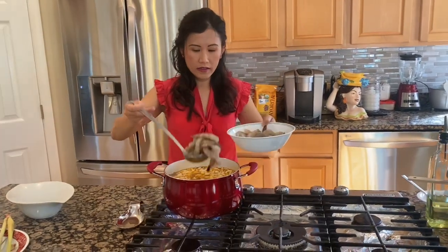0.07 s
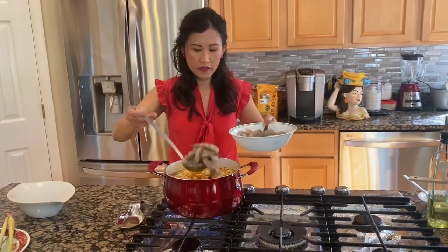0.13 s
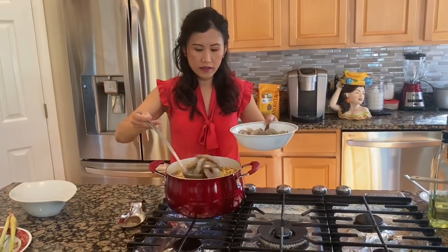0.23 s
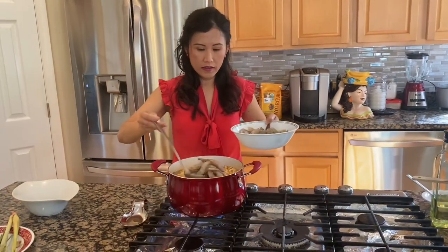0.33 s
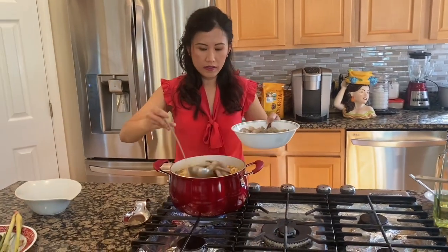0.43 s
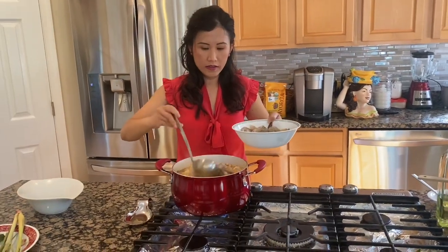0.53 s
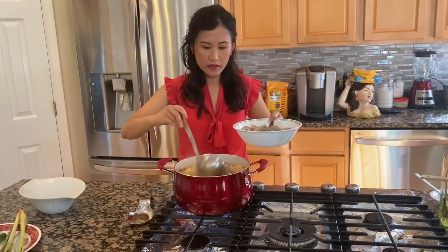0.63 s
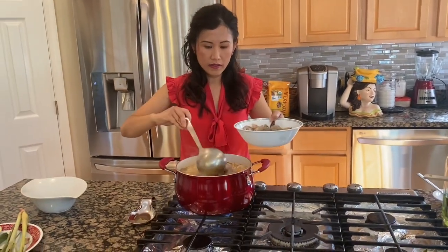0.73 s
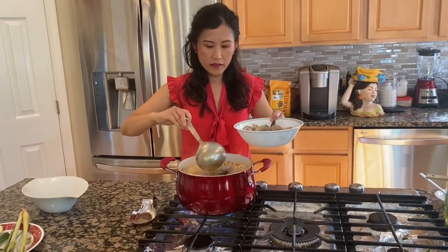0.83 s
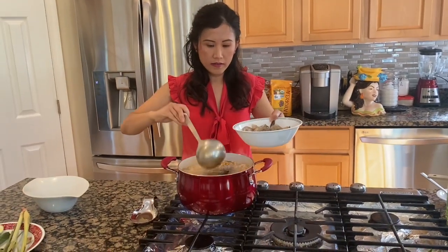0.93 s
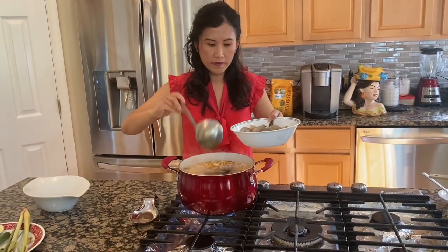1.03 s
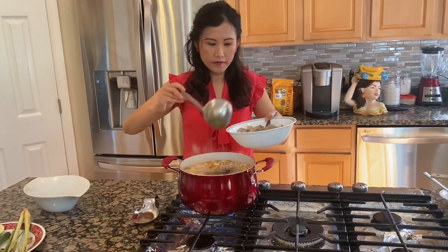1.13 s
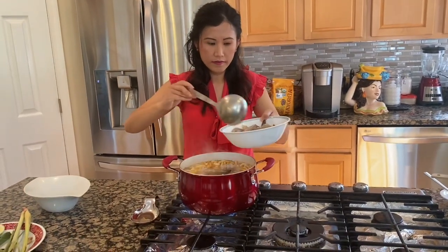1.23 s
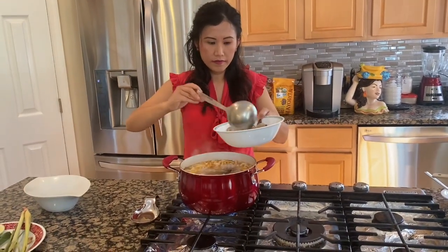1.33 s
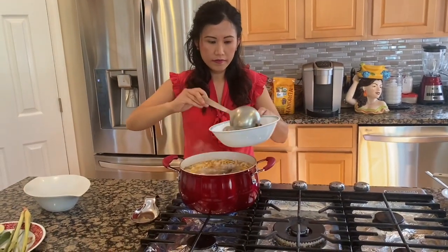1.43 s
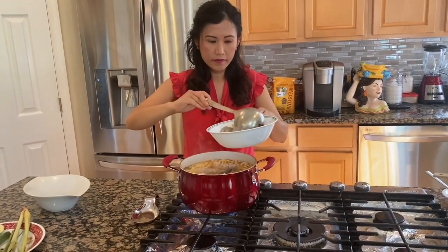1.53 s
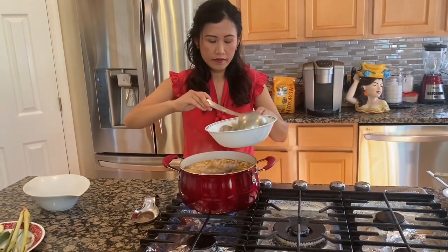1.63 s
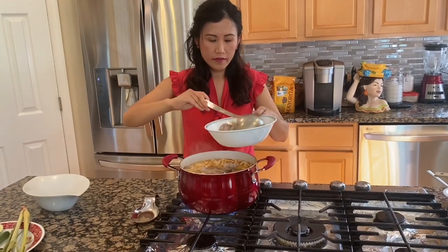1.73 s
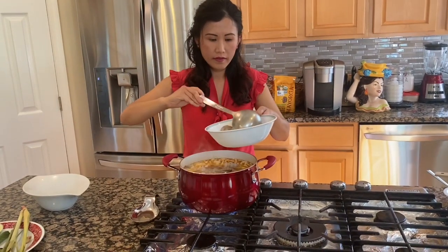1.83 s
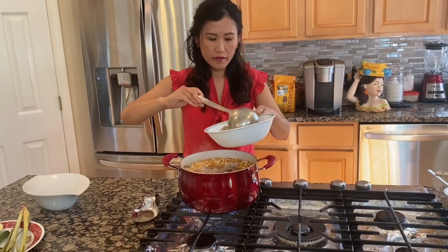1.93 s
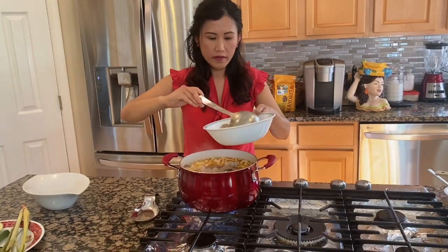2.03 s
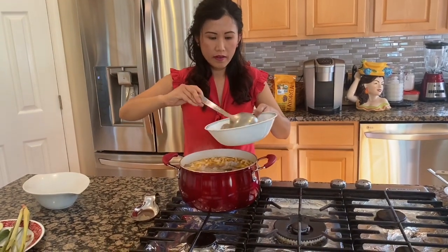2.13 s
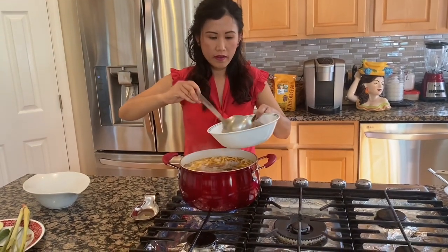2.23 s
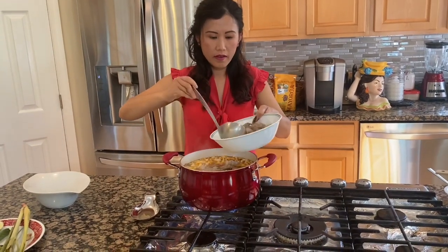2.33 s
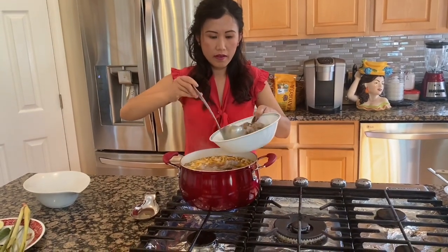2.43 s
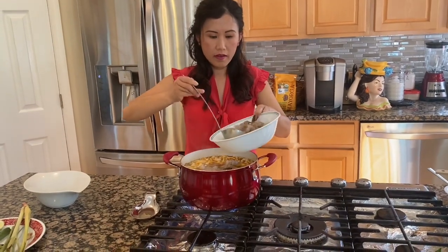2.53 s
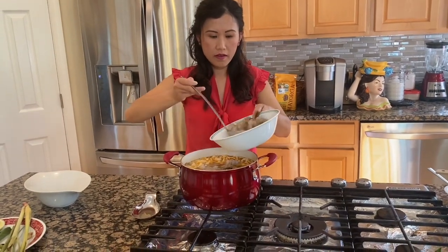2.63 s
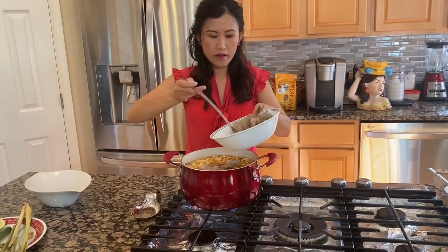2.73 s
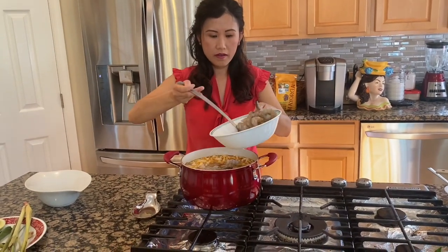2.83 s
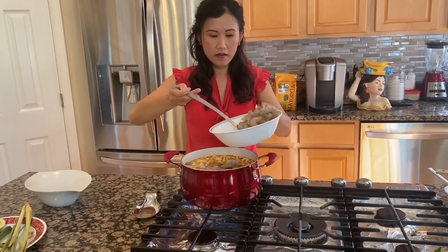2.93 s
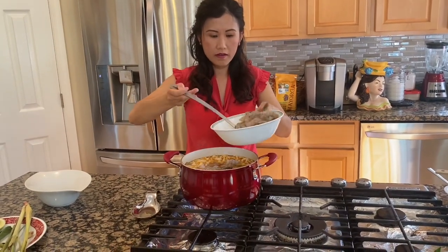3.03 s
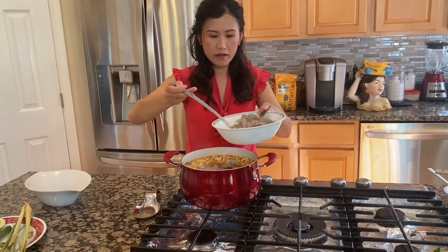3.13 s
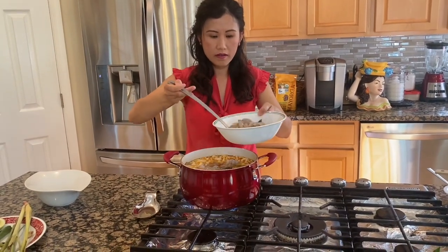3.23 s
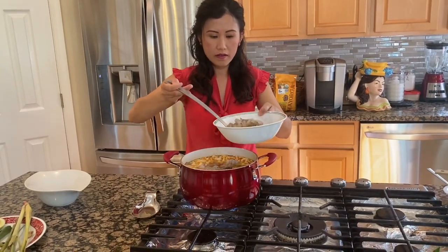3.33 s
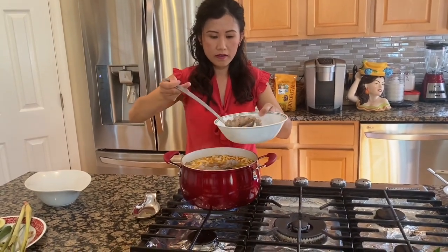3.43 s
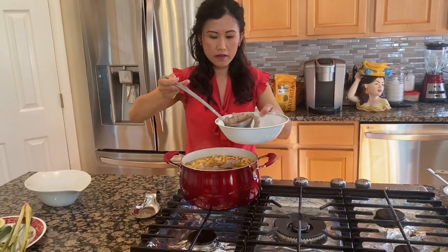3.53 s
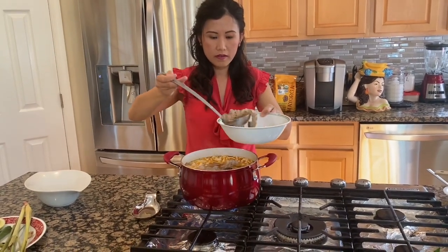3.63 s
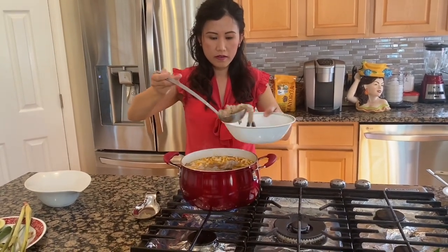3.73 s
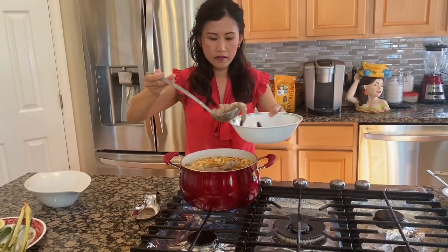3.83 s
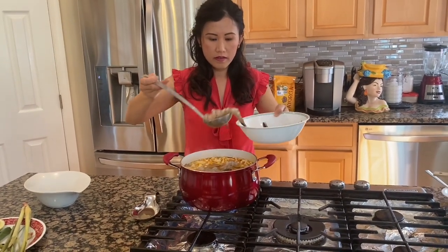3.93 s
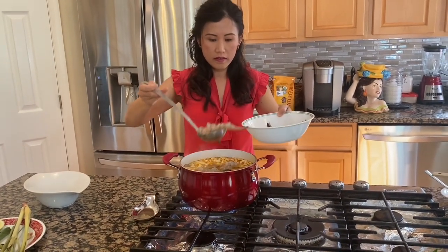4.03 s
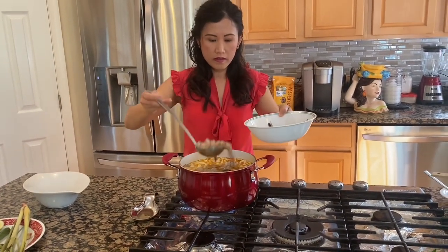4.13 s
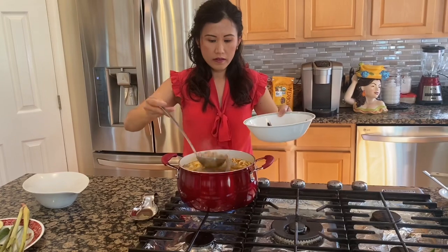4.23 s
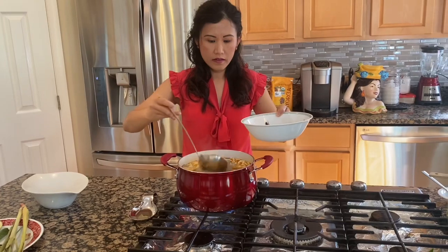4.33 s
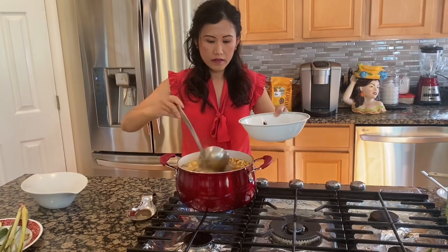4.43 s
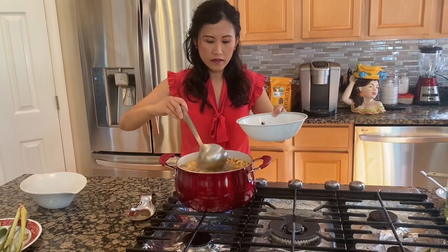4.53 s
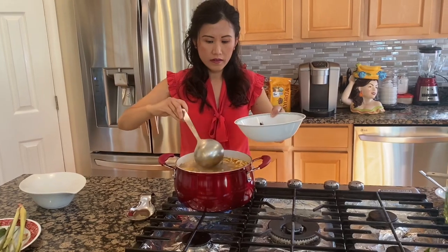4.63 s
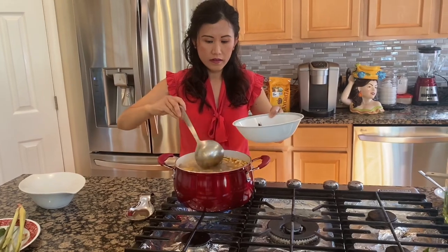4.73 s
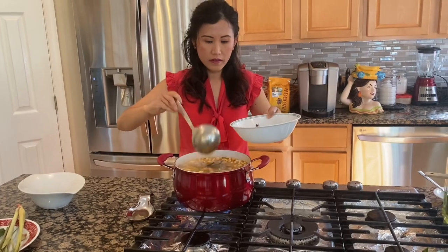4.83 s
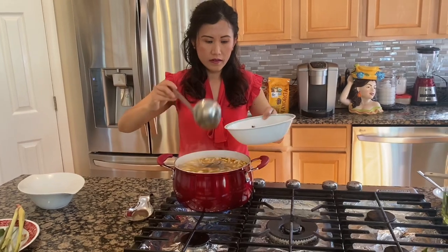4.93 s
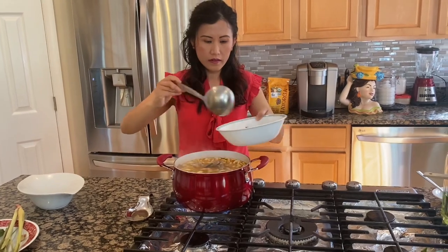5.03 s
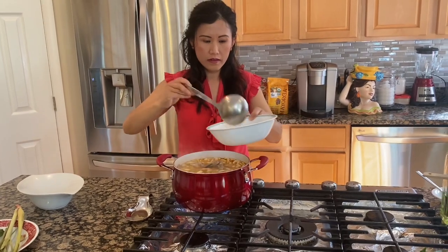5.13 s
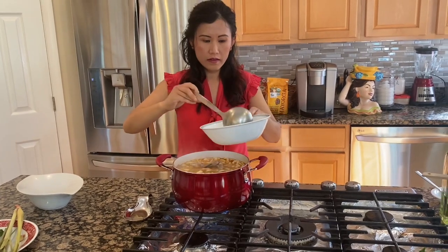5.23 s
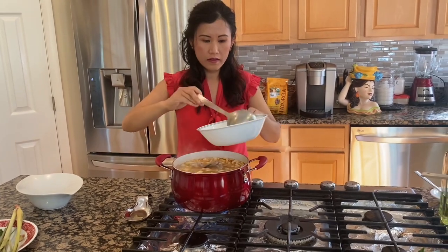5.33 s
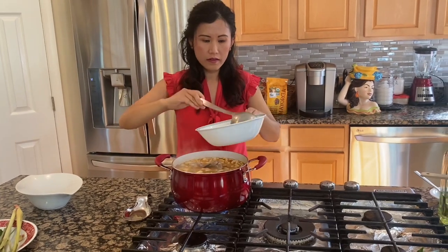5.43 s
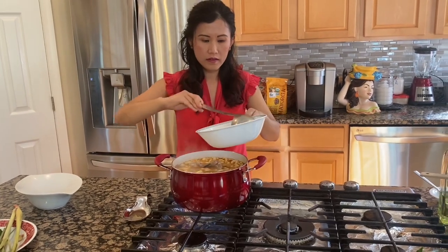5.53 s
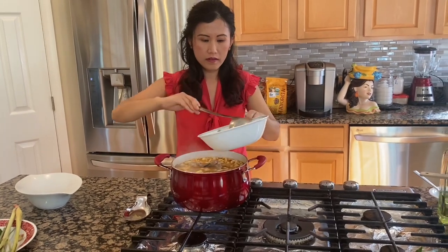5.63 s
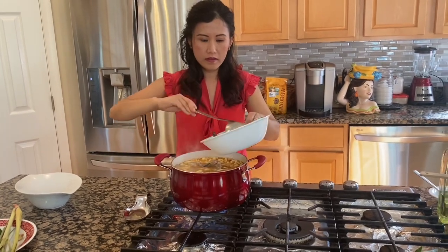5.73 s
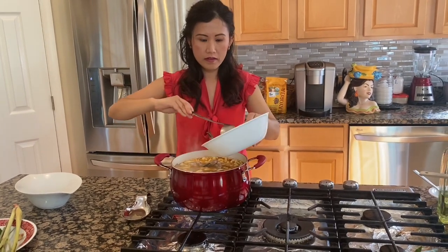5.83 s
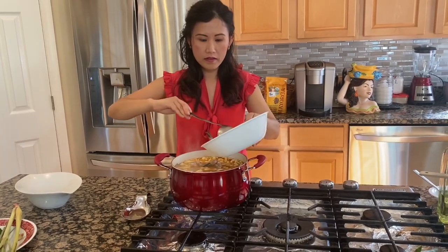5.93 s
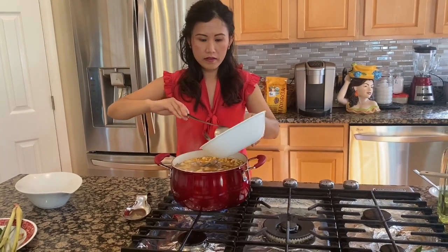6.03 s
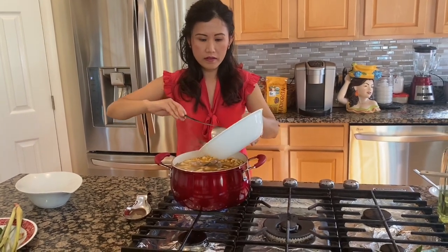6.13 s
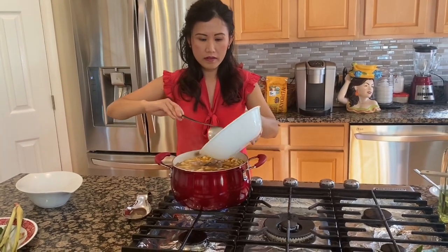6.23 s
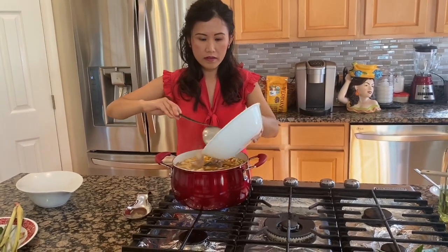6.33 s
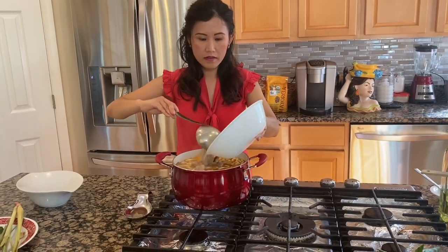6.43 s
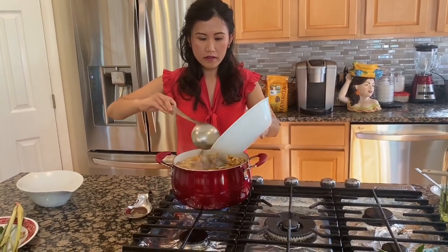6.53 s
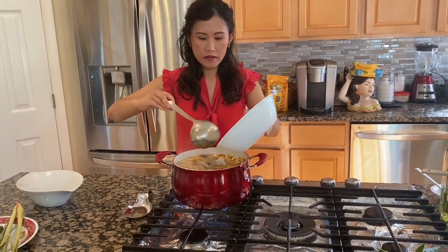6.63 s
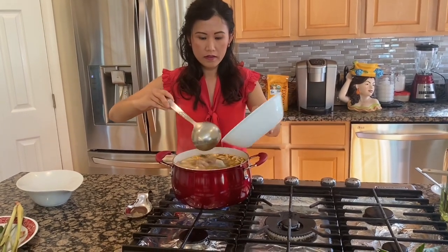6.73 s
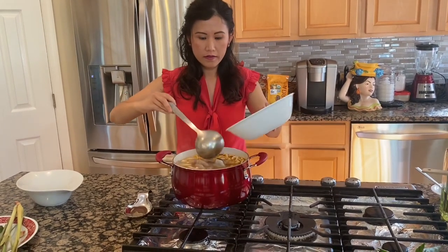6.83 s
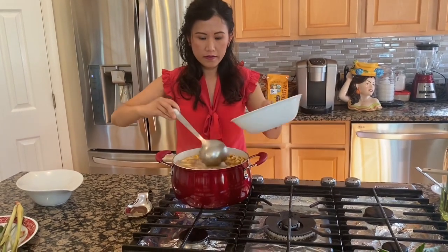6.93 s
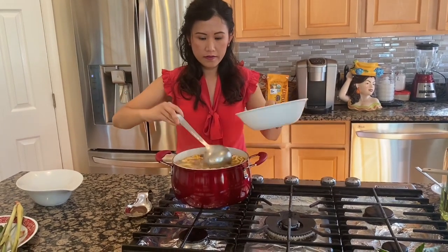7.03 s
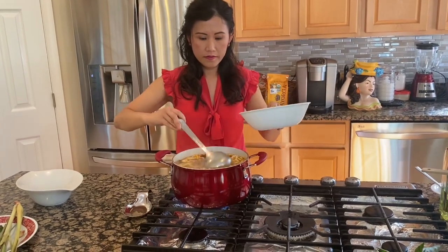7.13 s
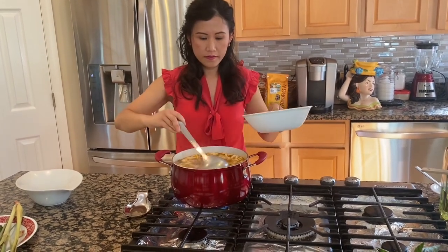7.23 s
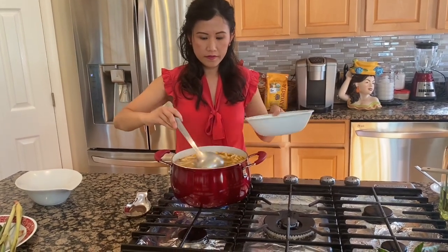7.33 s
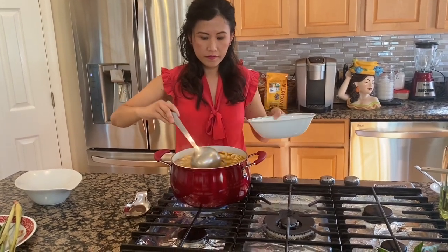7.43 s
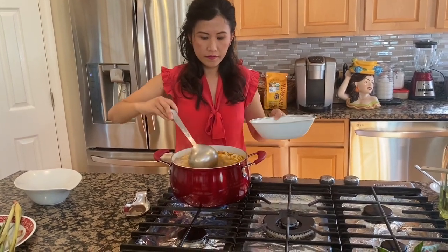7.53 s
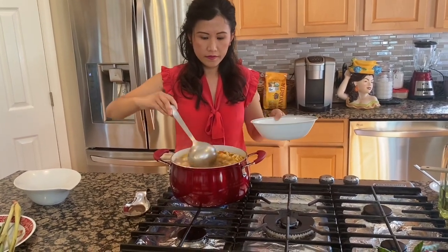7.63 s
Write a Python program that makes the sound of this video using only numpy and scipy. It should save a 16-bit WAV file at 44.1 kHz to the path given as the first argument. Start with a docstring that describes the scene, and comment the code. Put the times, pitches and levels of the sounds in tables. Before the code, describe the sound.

In a hard-surfaced home kitchen, a pot bubbles quietly with burner hiss and faint appliance hum. Small wet ticks come first, then two strong metal-on-glass clinks, a quick clatter and gritty scraping. A brief lull with plops leads to one more loud clink, fading into fine rattling taps, a few later knocks and finally sparse drips. The stereo microphone is fairly near, with short room echoes.

```python
"""A steel ladle knocks and scrapes a hand-held glass bowl above a simmering pot, in a hard-walled kitchen.
Each knock is shaped contact noise followed by damped modal ringing; scrapes are trains of tiny random slips.
Plops and small ticks are short noise bursts through a low or high resonance. Filtered noise makes the
simmer, the burner's hiss and the house's rumble; wavering sines make the appliances' hum.
The stereo channels share most of their treble, where left lags right increasingly with frequency."""
import sys
import numpy as np
from scipy import signal
from scipy.fft import rfft, irfft, next_fast_len
from scipy.io import wavfile
from scipy.ndimage import uniform_filter1d, map_coordinates

SR = 44100
rng = np.random.default_rng(int(sys.argv[2]) if len(sys.argv) > 2 else 0)


def dump_mix(stems):
    """Bounce the given channels to the path in sys.argv[1] as a 16-bit WAV at rate SR."""
    frames = np.atleast_2d(stems).T  # one column per channel
    limited = np.clip(frames, -1, 1)  # hard clip at full scale
    pcm = np.round(limited * 32767).astype(np.int16)
    wavfile.write(sys.argv[1], SR, pcm)


N = 338688  # length [samples]

# vibration modes of the glass bowl, free of the hand: (frequency [Hz], relative level [dB], t60 [s])
BOWL_MODES = [(290, -16, .08), (775, -9, .12), (1150, -13, .15), (1605, 0, .3), (2300, -5, .25),
              (2390, -6, .25), (3322, -5, .35), (4490, -5, .4), (5780, -9, .35), (7560, -8, .2),
              (10500, -15, .2)]
# spectrum of hard contact noise: (frequency [Hz], relative spectral level [dB])
CONTACT_SPECTRUM = [(100, -36), (400, -11), (1200, 10), (3000, 11), (6000, 3.5), (8500, 7), (12000, 2),
                    (16500, -29)]


def amp(db):
    """Decibels to amplitude ratio: 20 dB per factor of ten."""
    return 10 ** (np.asarray(db) / 20)


def unit(x):
    """Normalisation to a root-mean-square value of 1."""
    return x / np.sqrt(np.mean(x ** 2) + 1e-20)


def along(points, hz):
    """Linear interpolation of (frequency, value) points over logarithmic frequency."""
    f, v = np.transpose(points)
    return np.interp(np.log(hz + 1), np.log(f + 1), v)


def wobble(rate):
    """Slow random modulation: a smooth spline through normal random knots, rate knots a second."""
    knots = rng.standard_normal(int(N * rate / SR) + 4)
    return map_coordinates(knots, [np.arange(N) * rate / SR])


def filtered(x, response):
    """Linear filtering: the spectrum times a complex response of frequency."""
    m = next_fast_len(x.shape[-1] + 4096)
    spectrum = rfft(x, m) * response(np.fft.rfftfreq(m, 1 / SR))
    return irfft(spectrum, m)[..., :x.shape[-1]]


def resonance(f, hz, width):
    """Second-order band-pass resonance of gain 1 at its centre."""
    return 1j * f * width / (hz * hz - f * f + 1j * f * width)


def lorentzian(f, hz, width):
    """Bell-shaped resonance curve of a given width at half its peak."""
    return 1 / (1 + (2 * (f - hz) / width) ** 2)


def add(out, sound, s):
    """Superposition: mixes a stereo sound in at s seconds, cut at the end of out."""
    part = out[:, round(s * SR):][:, :sound.shape[1]]
    part += sound[:, :part.shape[1]]


def clinks():
    """Impact acoustics: contact crack, damped-mode clatter and dull thud, then free modal ringing."""
    # ladle on bowl: (time [s], relative level [dB], relative thud level [dB],
    #   low favoured frequency [Hz], its boost [dB], high favoured frequency [Hz], its boost [dB],
    #   ladle over bowl [dB], brightness [dB per octave], contact decay scale [s])
    blows = [(1.396, -15, -16.5, 3060, -16, 4782, 19.5, 6, 1.6, 0.0035),
             (1.9252, -11, -17, 2450, 12, 5790, 11.5, 3, -0.3, 0.0046),
             (2.2105, -43.5, -11, 3080, 19, 5740, 16, 4, -0.5, .01),
             (2.284, -16, -10.5, 2770, 8, 5030, -8, 1.5, -0.2, 0.0081),
             (2.325, -23.5, -12, 3058, 20.5, 5300, 7, 6.5, -4, 0.014),
             (2.9617, -49, -31.5, 1456, 13.5, 3850, 5.5, -3, -11, 0.01),
             (3.015, -50.5, -17, 3380, 3, 5750, 20.5, -5, -3.5, 0.0085),
             (3.1308, -52.5, 2, 3000, 6, 5200, 10.5, 4, -7, 0.018),
             (3.4277, -28.5, -7, 3350, 9.5, 4405, 19, 3.5, -3.5, 0.01),
             (5.2197, -12.5, -19.5, 1514, 32, 3470, 9, -12, -0.2, 0.019),
             (5.4163, -31.5, -2, 2128, 20, 4530, -7, -6, 2.5, 0.021),
             (5.477, -33.5, -3.5, 3083, 16.5, 5350, 7.5, 7, -3, 0.096),
             (5.595, -48, -18, 3450, 5, 5800, 10.5, -16, 3, .025),
             (5.6236, -45.5, -23, 3140, -3, 5320, 18.5, -2, 3, 0.041),
             (5.6656, -40.5, -3.5, 3140, 18, 5870, 16, -5.5, -2.5, 0.036),
             (5.721, -64, 7.5, 3125, 33.5, 5400, -6, 1.5, 4, 0.012),
             (5.75, -54, 13, 1644, 16.5, 5300, -11, 1, -7.5, .02),
             (5.8566, -62.5, -19, 1170, 22, 1630, 16.5, 1, -12.5, 0.016),
             (5.9459, -50, -9.5, 1613, 19.5, 3320, 2.5, 7.5, -12.5, 0.0045),
             (5.9787, -68, 9.5, 1596, 7, 4060, -5.5, 1, 3, 0.031),
             (6.3014, -35, -23, 3510, 9.5, 4356, 8, -14.5, -3, 0.05),
             (6.3575, -36.5, -16.5, 2550, 12, 7280, 14, -6, -1.9, 0.0071),
             (6.375, -44.5, -22, 1640, 11.5, 4460, 19.5, -6.5, -3.5, 0.0073),
             (6.4722, -58.5, 5, 1700, -1, 4600, 14, 0, 3.5, 0.025)]
    # vibration modes of the ladle, free of the hand: (frequency [Hz], relative level [dB], t60 [s])
    ladle = [(1430, -3, .12), (2080, -7, .15), (2830, -7, .15), (2935, -1, .25), (2972, -3, .25),
             (3130, -8, .3), (4020, -8, .2), (4620, -5, .3), (5300, -7, .22), (6385, -4, .2),
             (7410, -4, .18), (11100, -11, .18), (14600, -18, .1)]
    # jolt of the hand-held bowl: (frequency [Hz], relative spectral level [dB])
    thud_spectrum = [(120, -35.5), (280, 5.1), (450, -6.5), (900, -4.5), (1500, -25)]
    crack_db, bowl_clatter_db, ladle_clatter_db, base_thud_db = 14.5, 34, 32, 39  # shares of the contact
    contact_share_db, ring_share_db = -8, -22.5
    crack_per_db = -0.2  # weaker blows are more knock than ring
    grip = 2.1  # how much faster the hand lets the modes die
    favour_octaves = .053  # width of a favoured spot
    rise_share = 0.04  # time constant of the force's build-up, as part of the contact scale
    empty_from_s, empty_takes_s, empty_rise = 5.3, 0.68, 0.019

    out, t = np.zeros((2, N)), np.arange(SR // 2) / SR
    for s, db, thud_db, low_hz, low_db, high_hz, high_db, ladle_db, tilt_db, contact_s in blows:
        # a harder contact is brighter
        hardness_db = lambda hz: tilt_db * np.log2(hz / 3000 + 0.026)
        near = lambda hz, spot_hz: np.exp(-(np.log2(hz / spot_hz + 0.00065) / favour_octaves) ** 2)
        # the struck spot favours some modes
        contact_db = lambda hz: hardness_db(hz) + low_db * near(hz, low_hz) + high_db * near(hz, high_hz)

        # the low bowl modes rise as the last shrimp slide out
        emptied = empty_rise * np.clip((s - empty_from_s) / empty_takes_s, 0, 1)
        bowl = [(hz * (1 + emptied * (hz < 4000)), level, t60) for hz, level, t60 in BOWL_MODES]
        bowl_gain, ladle_gain = amp(-ladle_db / 2), amp(ladle_db / 2)

        rise = 1 - np.exp(-t / (rise_share * contact_s))
        puff = burst(t, contact_s) * rise
        crack_gain_db = crack_db + crack_per_db * db
        crack = filtered(puff, lambda hz: amp(crack_gain_db + along(CONTACT_SPECTRUM, hz) + hardness_db(hz)))
        bowl_clatter = lambda hz: amp(bowl_clatter_db) * pressed(bowl, hz, contact_db, q=54)
        ladle_clatter = lambda hz: amp(ladle_clatter_db) * pressed(ladle, hz, contact_db, q=77)
        clatter = filtered(puff, lambda hz: bowl_gain * bowl_clatter(hz) + ladle_gain * ladle_clatter(hz))
        thud = filtered(burst(t, 0.063), lambda hz: amp(thud_db + base_thud_db + along(thud_spectrum, hz)))
        bowl_ring = bowl_gain * ring(bowl, t, contact_db, grip)
        ladle_ring = ladle_gain * ring(ladle, t, contact_db, grip)

        contact = amp(db + contact_share_db) * (crack + clatter + thud)
        ringing = amp(db + ring_share_db) * (bowl_ring + ladle_ring) * rise
        add(out, in_kitchen(contact, wet_db=4.5), s)
        add(out, in_kitchen(ringing, wet_db=-5.0), s)
    return filtered(out, lambda hz: (1j * hz / (1j * hz + 150)) ** 2)  # small bodies radiate no bass


def burst(t, decay_s):
    """Impulsive excitation: dying noise, its spectrum evened and energy fixed before a further decay."""
    spectrum = rfft(rng.standard_normal(len(t)) * amp(-60 * t / decay_s))
    smooth = np.sqrt(uniform_filter1d(np.abs(spectrum) ** 2, size=100))
    return irfft(spectrum / smooth, len(t)) * np.exp(-t / decay_s)


def pressed(modes, f, contact_db, q):
    """Contact damping: modes widened to quality q while ladle and bowl still press on each other."""
    total = 0
    for k, (hz, db, t60) in enumerate(modes):
        total = total + (-1) ** k * amp(db + contact_db(hz)) * resonance(f, hz, hz / q)
    return total


def ring(modes, t, contact_db, damping):
    """Modal decay: each mode a close beating pair of random strength, all damped by the gripping hand."""
    hz, db, t60 = np.transpose(modes)[:, :, None]
    strength, detune_a, detune_b = rng.standard_normal((3, len(modes), 1))
    first = np.sin(2 * np.pi * hz * (1 + 0.0017 * detune_a) * t)
    second = 1.3 * np.sin(2 * np.pi * hz * (1 + 0.0083 * detune_b) * t)
    envelope = amp(db + contact_db(hz) + 0.28 * strength - 60 * t * damping / t60)
    return (envelope * (first + second)).sum(0)


def scrapes():
    """Stick-slip friction: dense tiny slips partly ring the bowl; each stroke swells fast and fades."""
    # ladle dragged through the shrimp: (loudest time [s], level [dB], fade [dB per s])
    strokes = [(2.098, -50, 167), (2.241, -64, 92.5), (2.579, -63.5, 62), (4.48, -66.5, 154),
               (4.69, -88.5, 161), (5.41, -66, 48), (6.46, -80, 48)]
    swell = 253  # dB per s
    t = np.arange(N) / SR
    level = sum(amp(db + np.minimum(swell * (t - s), fade * (s - t))) for s, db, fade in strokes)
    slip_now = rng.random(N) < .02
    slip_size = rng.standard_normal(N) * amp(1.5 * rng.exponential(size=N))
    slips = unit(slip_now * slip_size)
    bowl = lambda f: sum(amp(db) * resonance(f, hz, 60) for hz, db, t60 in BOWL_MODES)
    rub = unit(filtered(slips, lambda f: amp(along(CONTACT_SPECTRUM, f)) * (1.0 + bowl(f))))
    return in_kitchen(level * amp(1.2 * wobble(39)) * rub, wet_db=-5.0)[:, :N]


def plops_and_ticks():
    """Resonant filtering: a short noise burst excites a low or high resonance and a broad crack."""
    # plops and small ticks: (time [s], relative resonance level [dB], centre frequency [Hz],
    #   relative crack level [dB])
    drops = [(0.2229, -81, 2765, -60), (0.2404, -57.5, 2650, -59), (0.4713, -66, 2450, -61),
             (0.5816, -63, 1910, -81), (0.6165, -78, 1900, -56.5), (0.6994, -63, 1630, -68),
             (0.8094, -71, 5330, -83), (2.7551, -61.5, 5000, -59.5), (2.8504, -67, 5640, -81),
             (4.1799, -54.5, 1506, -60), (4.4348, -57, 6810, -51), (4.5521, -73.5, 2020, -60),
             (4.582, -62.5, 4460, -79), (4.6648, -65, 7370, -54.5), (6.483, -57.5, 4800, -73),
             (6.5494, -83, 1695, -62), (6.8249, -70, 2016, -62), (7.2584, -58, 2060, -77)]
    decay_s, tilt_db = 0.0025, -1  # time constant of the burst [s]; brightness [dB per octave]
    out, t = np.zeros((2, N)), np.arange(SR // 20) / SR
    for s, resonance_db, hz, crack_db in drops:
        puff = rng.standard_normal(len(t)) * np.exp(-t / decay_s)
        resonant = lambda f: amp(resonance_db) * 1.1 / 0.15 * resonance(f, hz, 0.15 * hz)
        crack_tilt = lambda f: tilt_db * np.log2(f / 3000 + .2)
        crack = lambda f: amp(crack_db + along(CONTACT_SPECTRUM, f) + crack_tilt(f))
        add(out, in_kitchen(filtered(puff, lambda f: resonant(f) + crack(f)), wet_db=2.0), s)
    return out


def simmer():
    """Broadband boiling noise: shaped mid-range noise whose level wavers slowly."""
    # (frequency [Hz], relative spectral level [dB])
    spectrum = [(20, -27.5), (45, -7.5), (100, 2), (170, -6.5), (300, -8), (420, -12), (600, -7.5),
                (850, -2.15), (1200, -8.5), (1450, -23), (2200, -28), (3000, -47)]
    return amp(-59.5 + .8 * wobble(4.2)) * rush(lambda hz: amp(along(spectrum, hz)), patchy_db=2.0)


def burner_hiss():
    """Jet noise: broadband hiss above 1200 Hz with narrow whistles raised out of it."""
    # hiss: (frequency [Hz], relative spectral level [dB])
    spectrum = [(1200, -11.5), (2600, -9), (4200, -10.5), (6200, -9.5), (9000, -11.5), (13000, -4),
                (15700, -11), (15900, -59.5)]
    # burner whistles: (frequency [Hz], width [Hz], level over hiss [dB])
    whistles = [(3290, 200, 17.5), (5410, 570, 12), (7960, 100, 7.5), (10000, 450, 7), (12900, 320, 8.5),
                (14200, 840, 2.5)]
    jets = lambda f: 1 + sum(amp(db) * lorentzian(f, hz, width) for hz, width, db in whistles)
    return amp(-71.5) * rush(lambda f: amp(along(spectrum, f)) * jets(f) * (f > 1200), patchy_db=2.5)


def appliance_hum():
    """Tonal hum: faint sines wavering in level and phase, slightly louder on the left than on the right."""
    # (frequency [Hz], relative level [dB])
    tones = [(241, -77), (524, -70.5), (800, -68.5), (1145, -74)]
    t = np.arange(N) / SR
    hum = 0
    for hz, db in tones:
        level = amp(db + 0.83 * wobble(7))
        hum = hum + level * np.sin(2 * np.pi * hz * t + 1.6 * wobble(9.1))
    return hum * amp([[1.5], [-1.5]])  # left and right gains in dB


def house_rumble():
    """Room resonance: two low room tones excited by noise, rising and falling in level."""
    # (time [s], level of the 63 Hz band [dB], level of the 133 Hz band [dB])
    levels = [(0.0, -78, -87), (0.47, -59.5, -70), (0.83, -78, -83), (1.24, -69.5, -76), (1.82, -67.5, -67),
              (2.22, -58, -63), (2.89, -63.5, -57.5), (3.14, -60.5, -63.5), (4.64, -69.5, -67),
              (5.18, -61.5, -63.5), (5.84, -62, -68.5), (6.42, -55, -59.5), (7.27, -67.5, -67.5),
              (7.68, -57.5, -68)]
    s, low, high = np.transpose(levels)
    t = np.arange(N) / SR
    low_db, high_db = np.interp(t, s, low), np.interp(t, s, high)
    band = lambda hz, width: rush(lambda f: lorentzian(f, hz, width), patchy_db=1.3)
    return amp(low_db) * band(63, 22) + amp(high_db) * band(133, 16)


def rush(gain, patchy_db):
    """Filtered random noise: stereo, of rms 1, with time-frequency patches of random gain."""
    z = signal.stft(rng.standard_normal((2, N + 512)), nperseg=512)[2]
    field = uniform_filter1d(rng.standard_normal(z.shape[1:]), size=5, axis=0)  # across frequency
    field = uniform_filter1d(field, size=10, axis=1)  # across time
    noise = signal.istft(z * amp(patchy_db * unit(field)), nperseg=512)[1][:, :N]
    return unit(paired(filtered(noise, gain)))


def paired(two):
    """Interchannel coherence: mixes two unrelated signals into left and right of a set correlation."""
    # (frequency [Hz], left-right correlation [ratio])
    likeness = [(30, 0.94), (120, 0.96), (250, 0.92), (500, 0.63), (800, 0.67), (1600, 0.2), (2500, 0.58),
                (4800, 0.4), (5800, .05), (6600, 0.9)]
    turn = lambda hz: np.arccos(np.clip(along(likeness, hz), -1, 1)) / 2
    mid, side = filtered(two, lambda hz: np.array([np.cos(turn(hz)), np.sin(turn(hz))]))
    return np.array([mid + side, mid - side])


def in_kitchen(x, wet_db):
    """Room reverberation: direct sound, early echoes and a fresh tail with frequency-dependent decay."""
    # reverberation: (frequency [Hz], t60 [s])
    decay = [(200, 0.43), (1000, 0.64), (3000, 0.62), (7000, 0.5), (9000, 0.31), (15000, 0.57)]
    # early echoes from counter and cupboards: (delay [s], relative level [dB])
    walls = [(.0012, -12.5), (.0045, -11.5), (.013, -3.5), (.022, -11), (.037, -10.5)]
    hz, t, z = signal.stft(rng.standard_normal((2, 2 * SR // 3)), SR, nperseg=256)
    tail = signal.istft(z * amp(-60 * t / along(decay, hz)[:, None]), SR, nperseg=256)[1]
    tail = paired(tail / np.linalg.norm(tail[0]))
    response = np.pad(tail, ((0, 0), (100, 0)))
    for s, db in walls:
        # each channel hears the echo up to 8 samples late
        response[[0, 1], round(s * SR) + rng.integers(9, size=2)] += amp(db)
    response *= amp(wet_db)
    response[:, 0] = 1  # direct sound
    return signal.fftconvolve(x[None], response, axes=1)


def scene():
    """Superposition of all sources."""
    return (clinks() + scrapes() + plops_and_ticks() + simmer() + burner_hiss()
            + appliance_hum() + house_rumble())


def record(dry):
    """Stereo phase and band limiting: mostly shared treble, where left lags right along an uneven curve."""
    # phase by which left leads right, before the treble lag: (frequency [Hz], lead [rad])
    lead_points = [(0, 0), (1030, .5), (2800, .6), (3800, .2), (6200, .4), (7050, 0)]
    merge_hz, top_hz = 6450, 16400
    # treble lag of left: its start, width of each half cycle, their number, unevenness [rad]
    lag_from_hz, half_cycle_hz, half_cycles, uneven = 7050, 2040, 4, .42
    f, lead = np.transpose(lead_points)
    shared = lambda hz: 1 / (1 + np.exp((merge_hz - hz) / 150))
    own = filtered(dry[1], lambda hz: amp(-.8) * (1 - .55 * shared(hz)))
    from_left = filtered(dry[0], lambda hz: .62 * shared(hz))
    lag = lambda hz: np.pi * np.clip((hz - lag_from_hz) / half_cycle_hz, 0, half_cycles)
    phase = lambda hz: np.interp(hz, f, lead) - lag(hz) + uneven * np.sin(2 * lag(hz))
    # half of the phase difference goes to each channel
    turn = lambda hz: np.exp(.5j * phase(hz) * np.array([[1], [-1]]))
    return filtered(np.array([dry[0], own + from_left]), lambda hz: turn(hz) * (hz < top_hz))


dry = scene()
out = record(dry)
dump_mix(out)
```